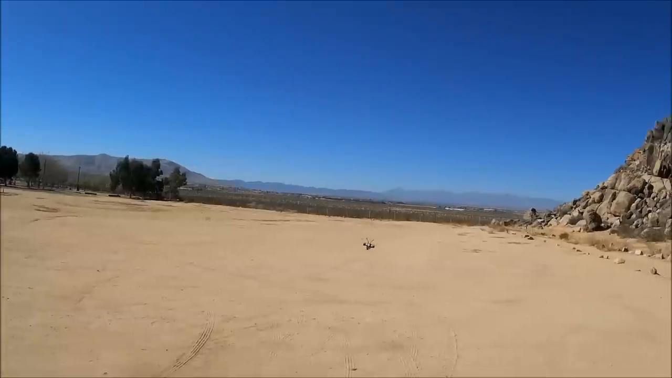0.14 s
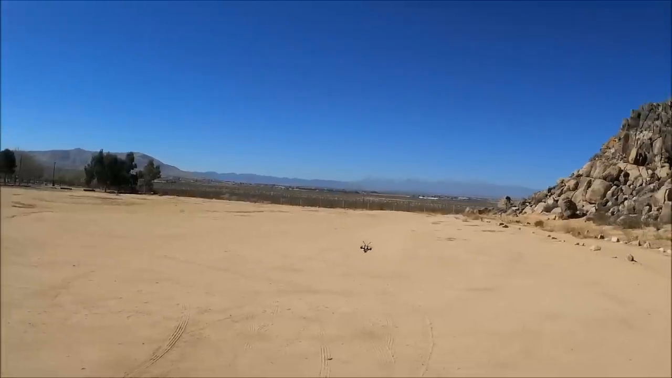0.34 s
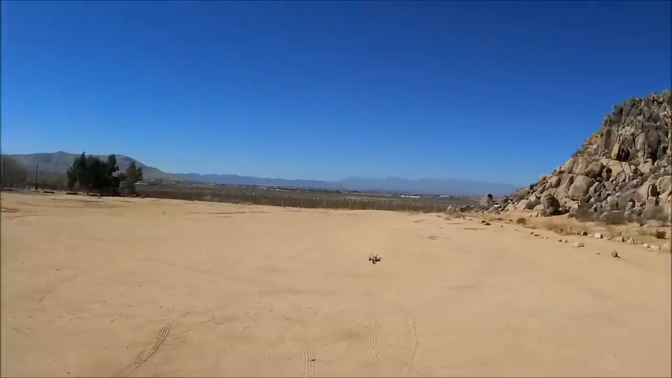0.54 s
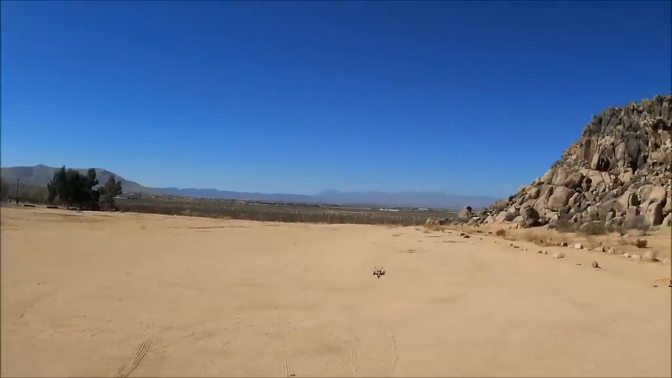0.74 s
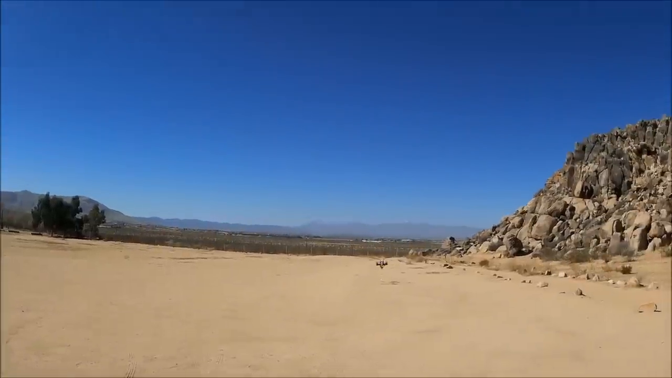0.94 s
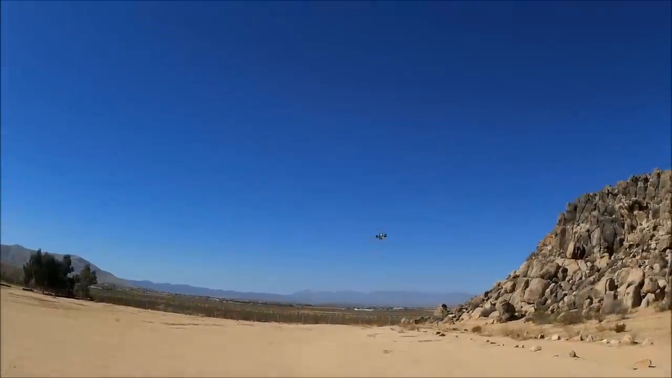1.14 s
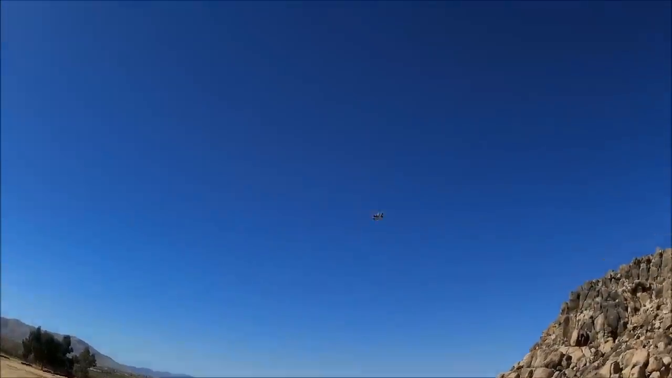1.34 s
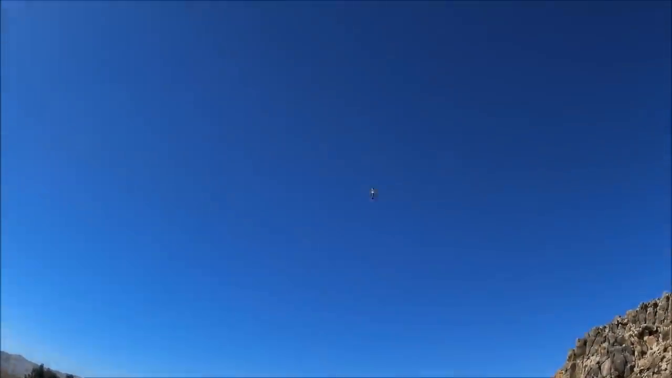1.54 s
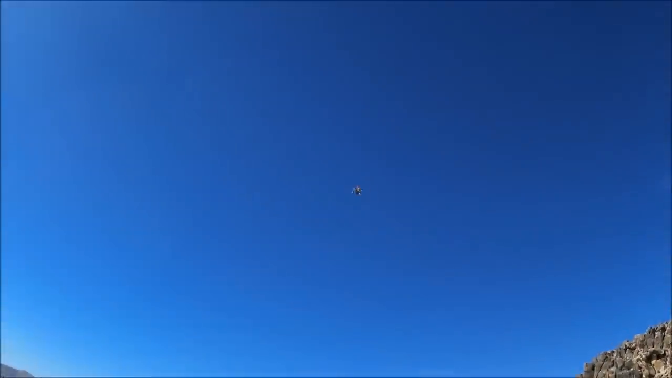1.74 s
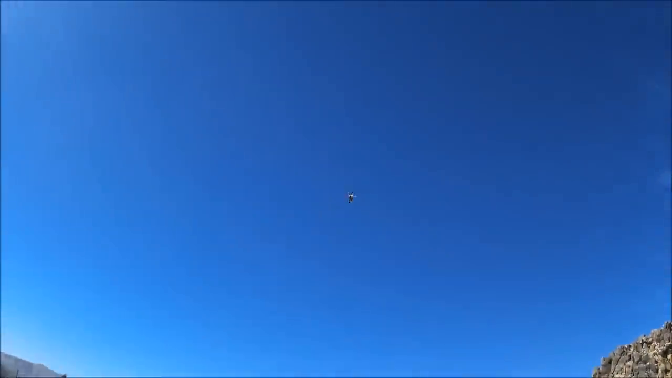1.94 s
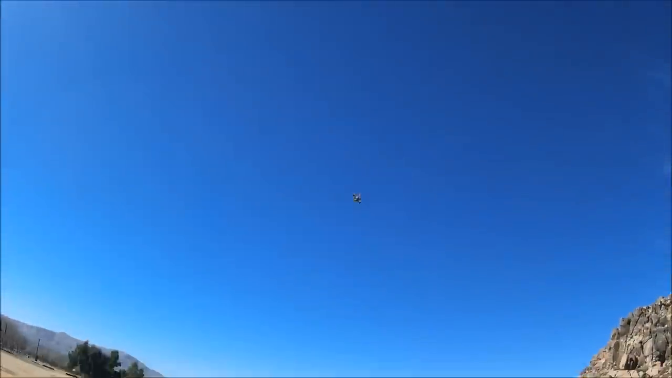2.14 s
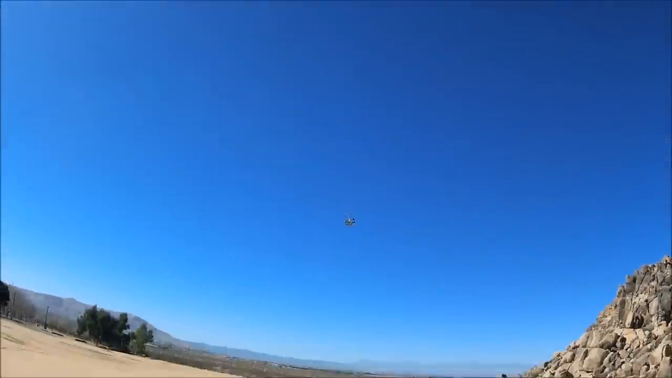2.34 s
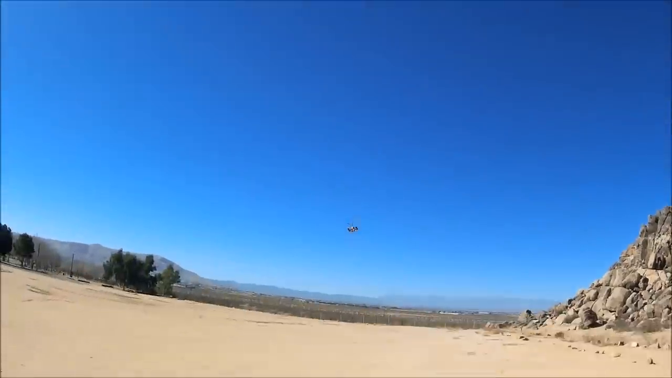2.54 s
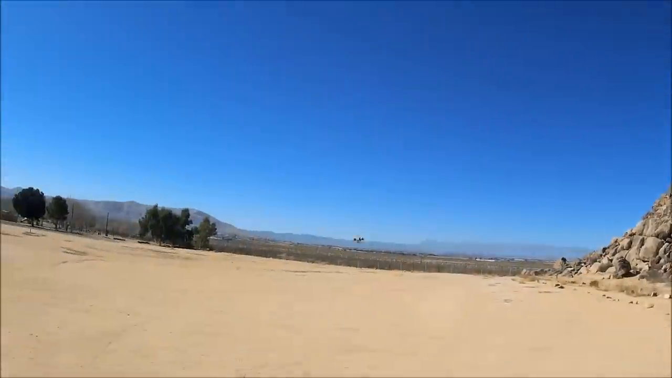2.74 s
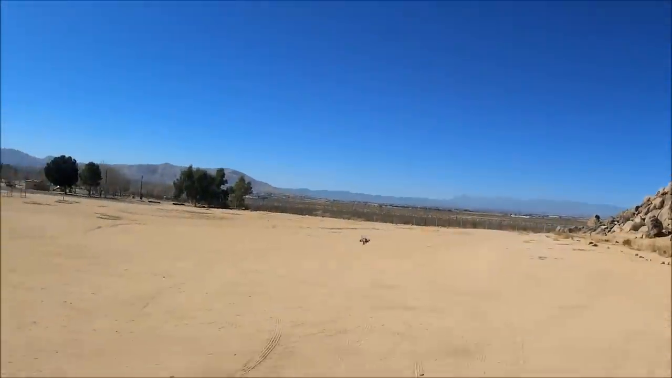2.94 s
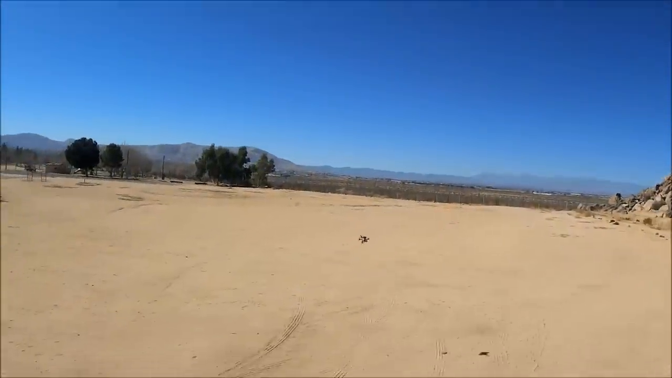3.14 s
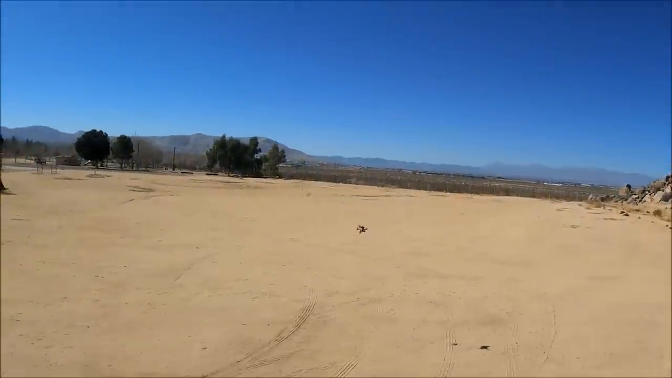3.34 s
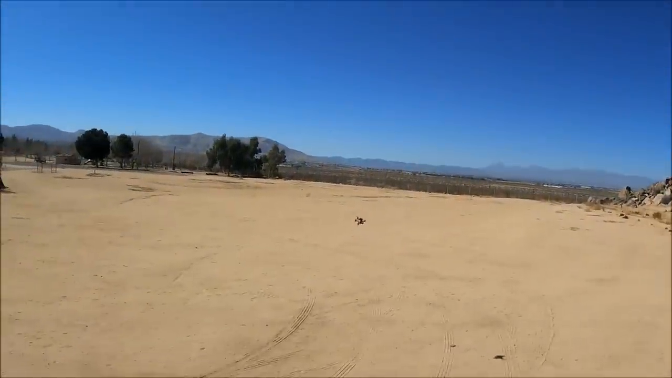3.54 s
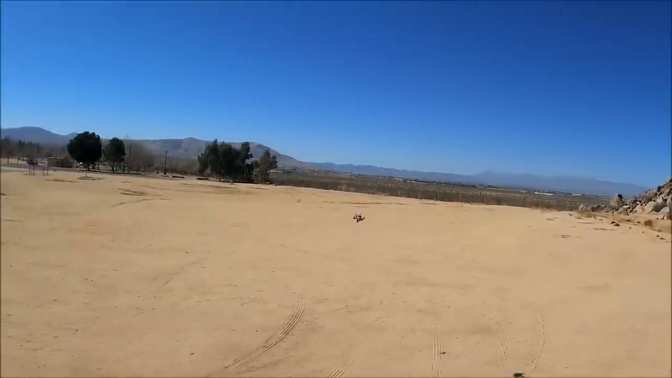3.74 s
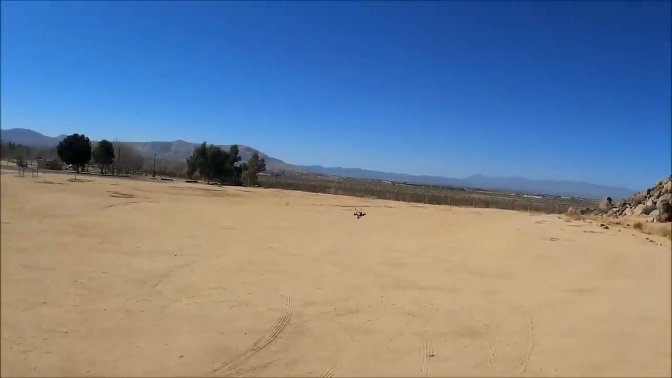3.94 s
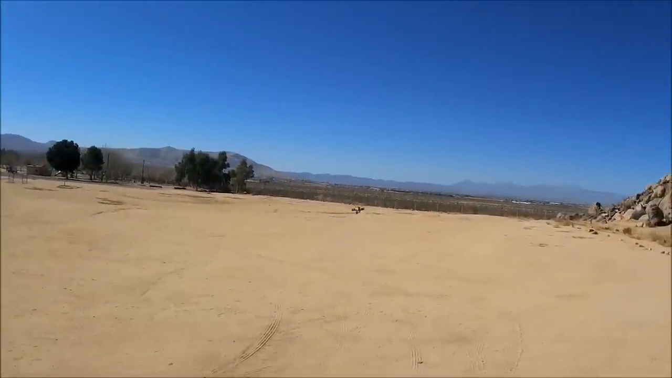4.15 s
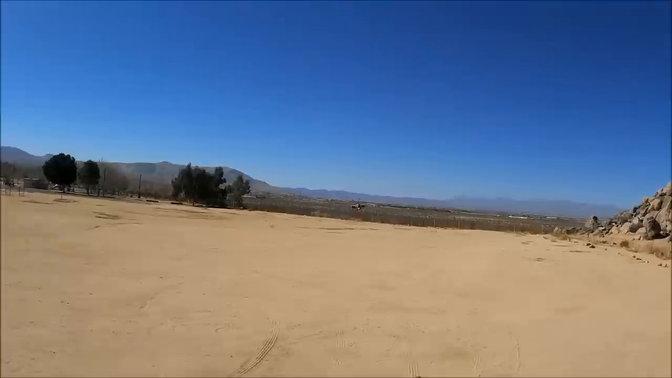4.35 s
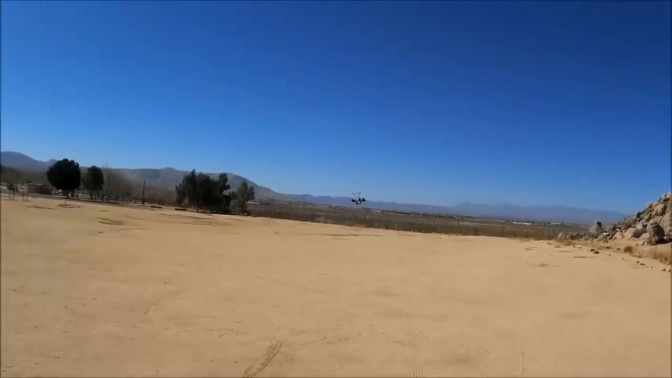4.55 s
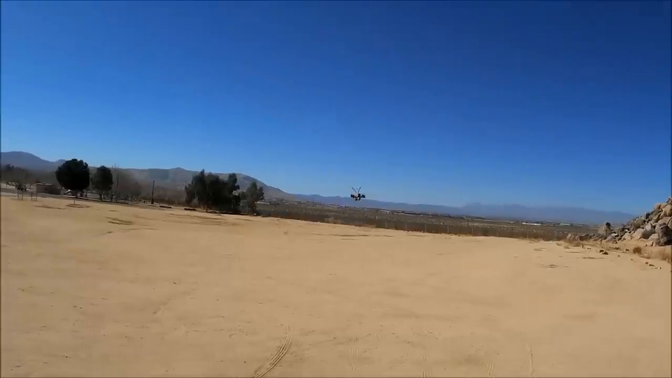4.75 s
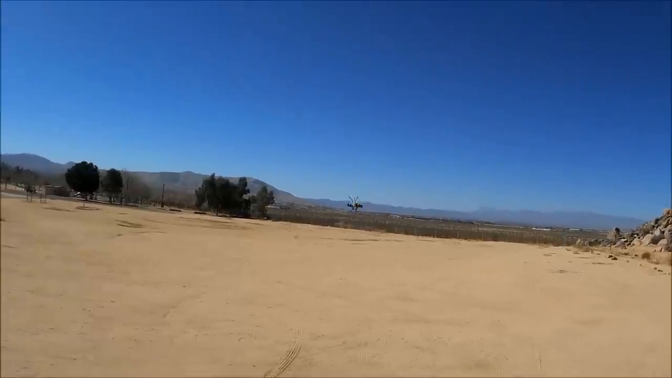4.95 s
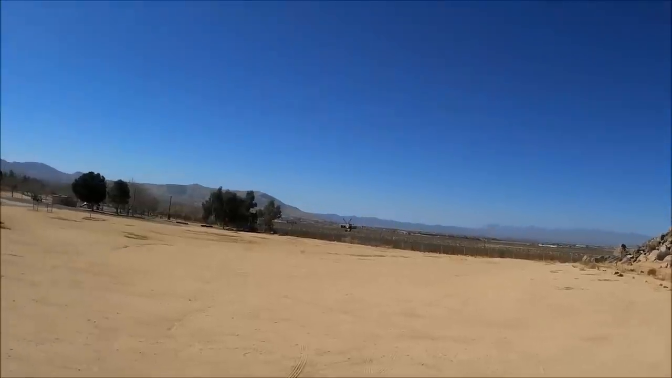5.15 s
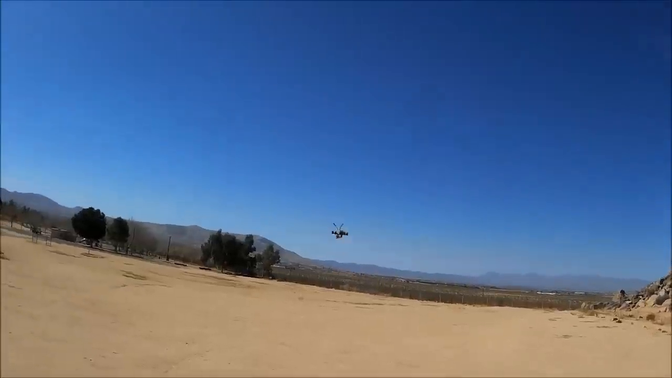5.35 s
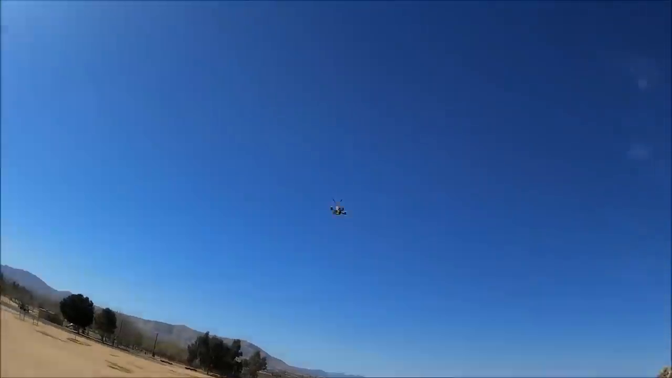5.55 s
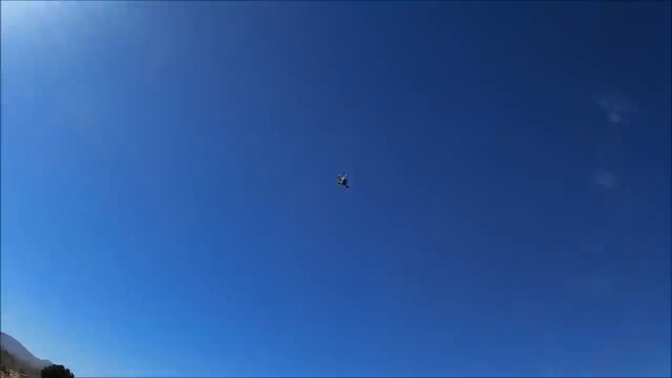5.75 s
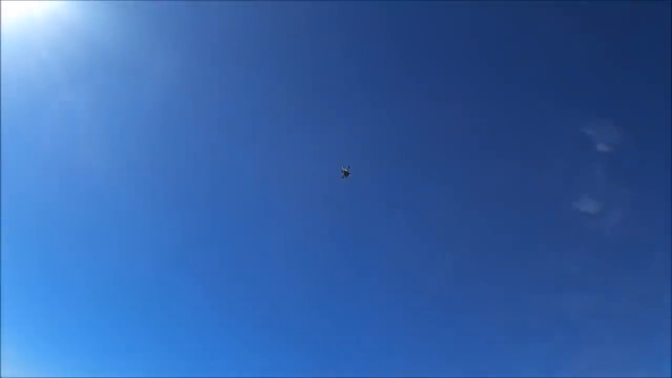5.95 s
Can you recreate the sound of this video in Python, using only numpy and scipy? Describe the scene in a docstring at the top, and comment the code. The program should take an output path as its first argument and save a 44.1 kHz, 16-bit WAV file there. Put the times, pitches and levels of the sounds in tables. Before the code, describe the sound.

A small quadcopter flies tricks over an open dry field, heard from a little way off. From 0 s its four slightly mistuned rotors give a moderate, beating buzz around 1.1 kHz, stepping upward. At 0.7 s a throttle punch winds quickly to a loud, piercing whine near 1.8 kHz, held with hissing wash and a rough frame buzz until about 1.2 s. The pitch then plunges to a thin, quiet, fluttering idle near 780 Hz until 2.2 s. From 2.3 to 3.1 s it returns coarse and turbulent, rising in uneven steps to about 1.5 kHz with heavy airy hiss. It sinks by 3.4 s into a softer wavering drone, with a short blip at 4.0 s. At 5.0 s another loud surge climbs near 1.8 kHz, buzzing before dropping after 5.55 s to a fading idle. Faint wind, low distant hum and short dull echoes remain underneath.

```python
"""A micro quadcopter with three-bladed propellers flies tricks over an open dry field.
Each punch of throttle winds four slightly unequal rotors, built from sine waves, up into a beating whine.
Prop wash, made of shaped noise, hisses around it; between punches the rotors fall back to a thin idle.
A short wash of echoes, light wind and a far low hum lie underneath."""
import sys
import numpy as np
from scipy import signal
from scipy.fft import rfft, irfft, next_fast_len
from scipy.io import wavfile

SR = 44100
rng = np.random.default_rng(int(sys.argv[2]) if len(sys.argv) > 2 else 0)


def wav_out(sig):
    """Save sig, one row per channel (or a flat mono array), as 16-bit PCM at SR to the path in sys.argv[1]."""
    wavfile.write(sys.argv[1], SR, np.round(np.clip(np.atleast_2d(sig).T, -1, 1) * 32767).astype(np.int16))


N = 265041
TIME = np.arange(N) / SR


def from_db(db):
    """Decibels to gain."""
    return 10 ** (np.asarray(db) / 20)


def rms_one(x):
    """Scale to an rms (average strength) of 1."""
    return x / np.sqrt(np.mean(x ** 2) + 1e-20)


def in_time(rows):
    """Draw straight lines between the rows of a table, for each column after the time."""
    s, *columns = np.transpose(rows)
    return [np.interp(TIME, s, column) for column in columns]


def at_hz(points, hz):
    """Read a level off a spectrum, on a log-frequency axis."""
    where_hz, level = np.transpose(points)
    return np.interp(np.log(hz), np.log(where_hz), level)


def during(start_s, end_s, edge_s):
    """A soft gate: 1 between two moments, 0 outside."""
    opening = np.tanh((TIME - start_s) / (2 * edge_s))
    closing = np.tanh((TIME - end_s) / (2 * edge_s))
    return (opening - closing) / 2


def drift(rate_hz):
    """Slow random wandering with spread 1: coarse noise, smoothed twice by a low-pass."""
    step, warm_up = 20, 2000   # samples per coarse point; coarse points thrown away while the filter settles
    pole = np.exp(-2 * np.pi * rate_hz * step / SR)
    noise = rng.standard_normal(N // step + warm_up + 2)
    slow = signal.lfilter([1], [1, -2 * pole, pole * pole], noise)[warm_up:]
    return np.interp(np.arange(N) / step, np.arange(len(slow)), rms_one(slow))


def banded_noise(spectrum):
    """Noise with the shape of the given spectrum; rms 1."""
    size = next_fast_len(N)
    hz = np.maximum(np.arange(size // 2 + 1) * SR / size, 1)
    shaped = rfft(rng.standard_normal(size)) * from_db(at_hz(spectrum, hz))
    return rms_one(irfft(shaped, size)[:N])


def common_speed():
    """Blade-pass pitch (Hz): each punch winds the rotors up against their inertia, then lets them fall back."""
    # pitch that the throttle rests at between punches: t/s, f/Hz
    cruise = [(0, 1056), (.15, 1059), (.28, 1133), (.45, 1135), (.6, 1269), (.9, 1279), (1.18, 805.4),
              (2.1, 769), (2.26, 887.6), (2.38, 1210), (2.6, 1207), (3.7, 1118), (3.95, 1097), (4.35, 1037),
              (4.55, 1022), (4.9, 1010), (5.3, 1059), (5.55, 762.5), (6.01, 787)]
    # punches of throttle, each building on what is already there:
    # start/s, top f/Hz, spin-up time/s, let-go t/s, spin-down time/s
    punches = [(.67, 1828, 0.066, 1.189, .13), (2.48, 1367, .022, 3.374, .165),
               (2.57, 1416, .022, 3.26, .075), (2.85, 1540, .055, 3.245, .05),
               (3.972, 1335, 0.025, 4.125, .1), (5.01, 1797, 0.072, 5.563, .163)]
    hz, = in_time(cruise)
    for start_s, top_hz, up_s, let_go_s, down_s in punches:
        rise = np.maximum(TIME - start_s, 0) / up_s
        fall = np.maximum(TIME - let_go_s, 0) / down_s
        punch = (1 - (1 + rise) * np.exp(-rise)) * np.exp(-fall ** 2)
        hz = hz + (top_hz - hz) * punch
    return hz


def rotor_speeds(hz):
    """Blade-pass pitch of four rotors: a little apart, the outer two shifting to steer the craft."""
    # each rotor in level flight, slowest first: share above the common speed
    trim = [-.016, -.006, .006, .018]
    # the slowest and fastest rotor leave or rejoin the others: start/s, end/s, share slower, share faster
    tilts = [(0, 1.215, .012, 0.037), (.88, 1.25, 0.036, -.004), (1.552, 2.47, .03, .05),
             (2.56, 3.12, .115, -.003), (3.14, 3.6, -.008, -.012), (4.3, 5.028, -.008, .03),
             (5.14, 5.599, .04, -.013)]
    tilt = 0
    for start_s, end_s, slower, faster in tilts:
        tilt = tilt + np.outer([-slower, 0, 0, faster], during(start_s, end_s, edge_s=0.0199))
    return hz * (1 + np.array(trim)[:, None] + tilt)


def slowing(hz):
    """How fast the rotors lose speed (octaves per second)."""
    return np.maximum(-np.gradient(np.log2(hz)) * SR, 0)


def blade_levels(hz, buffet):
    """Levels (dB) of blade tone, fourth order, overtones and wash, from speed, braking, load and facing."""
    # blade-pass tone by speed, before the changes below: blade-pass f/Hz, level/dB
    tone = [(760, -77.5), (1050, -64), (1180, -57), (1320, -49), (1480, -46.5), (1680, -37), (1850, -36)]
    # the fourth shaft order swells as it crosses a resonance: its own f/Hz, level/dB before the changes below
    fourth = [(1020, -99.5), (1380, -66.5), (1560, -67), (1660, -56), (1750, -47.5), (1950, -57.5),
              (2200, -62.5), (2420, -60)]
    # the turning craft beams its sound towards or away from the microphone:
    # t/s, blade tone change/dB, overtones and wash change/dB
    facing = [(0, -5, -1.5), (.25, -0.5, -2.5), (.6, 1.5, 0.5), (.95, 3, -1), (1.17, -1, 0),
              (1.4, -4.5, -5), (2.28, 0.5, -1), (2.42, 3.5, -0.5), (2.55, 4, 0), (2.72, 2, 0),
              (2.93, -0.5, -3), (3.06, 2.5, -4), (3.16, -11, -2), (3.28, -2.5, -3.5), (3.55, -4, -2),
              (3.76, -11.5, -3), (3.95, -5, -4), (4.14, 3, 3.5), (4.4, -0.5, -2.5), (5, 0, 1.5),
              (5.25, 5, 3.5), (5.62, 3, 1.5), (5.78, 1.5, 4), (5.88, -4, -4.5), (6.01, -22, -5)]
    tone_facing_db, hiss_facing_db = in_time(facing)
    octaves = np.log2(hz / 1845)
    braking = slowing(hz)
    # pulling out of the dive loads the blades
    pull = during(2.392, 3.106, edge_s=0.035)

    def grown(full_db, idle_db, db_per_octave):
        """A power law of speed above an idle level, changed by the facing."""
        power_law = from_db(full_db + db_per_octave * octaves)
        return 20 * np.log10(np.hypot(power_law, from_db(idle_db))) + hiss_facing_db

    # braking blades are louder: dB for each octave per second of slowing
    strain_db = 0.99 * braking + 2.5 * pull
    stall_db = 2.5 * buffet ** 4   # blade tone lost in buffeting
    tone_db = at_hz(tone, hz) + strain_db + tone_facing_db - stall_db
    # the fourth order follows only part of the tone's beaming
    fourth_db = at_hz(fourth, hz * 4 / 3) + strain_db + 0.24 * tone_facing_db
    overtone_db = grown(full_db=-49.5, idle_db=-74.5, db_per_octave=30.5) + 0.87 * braking + 10.5 * pull
    wash_db = grown(full_db=-52, idle_db=-79, db_per_octave=23.5) + 0.95 * braking + 10 * pull
    return tone_db, fourth_db, overtone_db, wash_db


def rotor(blade_hz, tone_db, fourth_db, overtone_db, buffet):
    """One motor and its three blades: a stack of shaft orders. Returns the sound and the shaft angle."""
    # overtones of a loaded blade: multiple of blade pass, relative level/dB
    overtones = [(2, 2), (3, -3), (4, -6.5), (5, -10), (6, -19), (7, -22)]
    # unequal blades also sound at other shaft orders: multiple of shaft speed, level/dB relative to the overtones
    imbalance = [(5, -11.5), (7, -15), (8, -14), (10, -17), (11, -15.5), (13, -50), (16, -14), (20, -23)]
    # how the small frame radiates the shaft hum and overtones: f/Hz, boost/dB
    frame = [(370, -0.5), (450, 2.5), (495, -3.5), (545, -2), (600, -1), (900, 7), (1550, 2.5), (2050, 3.5),
             (2350, -11), (2850, 2.5), (3100, 1.5), (3550, 1.5), (4000, -4), (4550, 2.5), (5250, 5.5),
             (5900, -4), (7200, -1), (8000, -25), (9000, 1), (11000, 9)]
    # the flight controller keeps trimming the speed, and eddies jostle the blades (shares of the speed)
    hunting = 0.003011 * drift(13.26)
    jitter = 0.003007 * drift(142.6)
    wake_jitter = 0.02989 * buffet ** 2 * drift(49.4)
    shaft_hz = blade_hz / 3 * (1 + hunting + jitter + wake_jitter)
    angle = 2 * np.pi * np.cumsum(shaft_hz) / SR
    flutter_db = 2.5 + 4.5 * buffet

    def partial(order, level_db):
        """One fluttering shaft order, carrying a quarter of the power of the four rotors."""
        wave = np.sin(order * angle + rng.uniform(0, 2 * np.pi)) / np.sqrt(2)
        return from_db(level_db + flutter_db * drift(14.7)) * wave

    # the hum of an unbalanced shaft grows steeply with its speed
    hum_db = -61 + 95 * np.log10(shaft_hz / 500)
    hum = partial(order=1, level_db=hum_db + at_hz(frame, shaft_hz))
    hum = hum + partial(order=2, level_db=np.maximum(hum_db - 10, fourth_db - 17))
    blades = partial(order=3, level_db=tone_db) + partial(order=4, level_db=fourth_db + 0.6)
    orders = [(3 * round(k), db) for k, db in overtones] + [(round(k), db) for k, db in imbalance]
    edge = sum(partial(k, overtone_db + db + at_hz(frame, k * shaft_hz)) for k, db in orders)
    roughness = from_db(2 * drift(74) - 5.5)
    return hum + blades + edge * roughness, angle


def motor_whistle(angle, buffet, speed_hz):
    """One motor sings thinly as its magnets pass the stator teeth; buffeting and braking thin the note out."""
    # magnetic whine: multiple of shaft speed, level/dB before the changes below
    cogging = [(24, -76.5), (30, -77), (36, -62.5)]
    # how the motor radiates its whine: f/Hz, boost/dB
    motor_case = [(8000, -37), (9400, 0), (10300, 5), (11000, 10.5), (11600, 20), (12250, -10),
                  (12900, -18), (16000, -37)]
    shaft_hz = np.gradient(angle) * SR / (2 * np.pi)
    lines = 0
    for order, db in cogging:
        gain = from_db(db + at_hz(motor_case, order * shaft_hz))
        lines = lines + gain * np.sin(round(order) * angle)
    steady = np.clip(1 - 1.3 * buffet ** 2, 0, 1)
    brake_loss_db = 1.5 * slowing(speed_hz)   # 1.5 dB for each octave per second
    return steady * lines * from_db(3 * drift(20) - 8 - brake_loss_db)


def frame_rattle(angles):
    """Late in a full punch the frame buzzes roughly on the fifth shaft order of all four motors."""
    # start/s, end/s, level/dB
    rattles = [(0.993, 1.224, -49), (5.483, 5.589, -50)]
    level = sum(from_db(db) * during(start_s, end_s, edge_s=0.022) for start_s, end_s, db in rattles)
    shake = sum(np.sin(5 * angle) * from_db(3.5 * drift(120)) for angle in angles)
    return level * rms_one(shake)


def prop_wash(level_db, angles, buffet):
    """Turbulent hiss, chopped each time a blade sweeps past an arm; buffeting thins out its low part."""
    # turbulence off the blades: f/Hz, relative level per Hz/dB
    wash = [(100, 7), (250, -0.5), (600, 11.5), (850, 8.5), (1250, 10.5), (1800, 15), (2200, -8.5),
            (3000, 3), (4000, -1.5), (5100, 6.5), (6000, -2), (7900, -2), (9000, 4), (12200, 6),
            (12900, -6), (15500, -10)]
    hiss = banded_noise(wash)
    treble_filter = signal.butter(4, 6000, "high", fs=SR, output="sos")
    body_filter = signal.butter(1, 900, fs=SR, output="sos")
    treble = signal.sosfilt(treble_filter, hiss)
    body = signal.sosfilt(body_filter, hiss)
    # scaled so that the treble of the full hiss has spread 1
    hiss = (hiss - np.clip(buffet, 0, 1) * body) / np.std(treble)
    sweeps = sum(np.cos(3 * angle) for angle in angles)
    chopping = rms_one(1 + 0.32 * sweeps)
    return hiss * chopping * from_db(level_db - 3.5)


def scatter(x):
    """Ground and rocks throw back a short, dull wash of echoes: noise that dies away."""
    t = TIME[:SR // 2]
    t60_s = 0.31   # time to fall by 60 dB
    tail = rng.standard_normal(len(t)) * from_db(-60 * t / t60_s) * (t > 0.005)
    tail /= np.sqrt(np.sum(tail ** 2))
    tail = signal.sosfilt(signal.butter(1, 4000, fs=SR, output="sos"), tail)
    return from_db(-15) * signal.fftconvolve(x, tail)[:N]


def still_air():
    """Steady faint hiss of still air and microphone."""
    # f/Hz, relative level per Hz/dB
    air = [(25, -8), (140, -5), (220, -11), (400, -18), (600, -16), (1000, -22.5), (2500, -30), (6000, -29),
           (10000, -27), (15500, -30.5)]
    return from_db(-68) * banded_noise(air)


def field():
    """Wind lumps on the microphone, made of low noise, and a far wavering hum of two sine waves."""
    # colour of the wind: f/Hz, relative level per Hz/dB
    wind = [(20, 9), (40, 2.5), (70, 6), (130, -17.5), (300, -3.5), (1000, -65), (15000, -100)]
    # middle level of the wind, which then wanders: t/s, level/dB
    gusts = [(0.0, -69.5), (0.47, -65), (0.72, -59), (1.92, -80.5), (2.56, -68.5), (6.01, -68)]
    # far low hum, which also wanders in pitch and level: t/s, f/Hz, level/dB
    hum_path = [(0, 99.3, -69), (1.6, 100.2, -80.5), (3.4, 89.1, -72.5), (3.85, 88.1, -66),
                (4.15, 98.36, -60.5), (4.6, 98.85, -69.5), (5, 102.8, -72.5), (6.01, 99.75, -69.5)]
    gust_db, = in_time(gusts)
    hum_hz, hum_db = in_time(hum_path)
    phase = 2 * np.pi * np.cumsum(hum_hz * (1 + 0.0223 * drift(10.6))) / SR
    # a quieter second note sounds at one and a half times the pitch
    hum = np.sin(phase) + from_db(-7) * np.sin(3 * phase / 2)
    wind_noise = from_db(gust_db + 2.5 * drift(21)) * banded_noise(wind)
    return wind_noise + from_db(hum_db + 2.5 * drift(16)) * hum


def brief_dips():
    """Gain that sinks for an instant now and then, along bell-shaped curves."""
    # t/s, depth/dB, width/s
    dips = [(.243, 9, .006), (.374, 8, .005), (2.122, 9, .006), (2.311, 14, .007), (2.74, 9, .006),
            (2.834, 24, .008), (3.125, 5, .006), (3.868, 6, .006), (4.338, 8, .006), (4.6, 6, .005),
            (4.705, 7, .005), (4.852, 8, .005), (5.343, 5, .006), (5.77, 8, .006)]
    loss_db = sum(depth_db * np.exp(-0.5 * ((TIME - s) / width_s) ** 2) for s, depth_db, width_s in dips)
    return from_db(-loss_db)


def scene():
    """Four rotors and their wash over the quiet field; all but the direct whine dips briefly at times."""
    # falling into its own wake buffets the blades: t/s, buffeting from 0 to 1
    buffet_path = [(0, 0.02), (1.2, 0.14), (1.33, 0.55), (2.1, 0.6), (2.2, 0.98), (2.42, 1), (2.56, .63),
                   (3.05, .42), (3.15, 0.09), (5, 0.06), (5.6, 0.11), (5.79, 0.49), (6.01, .55)]
    # how loudly each rotor reaches the microphone, slowest first: relative level/dB
    rotor_db = [-3.5, 1, -0.1, -0.95]
    # how much edge each rotor has, slowest first: change of its overtones/dB
    rotor_edge_db = [2, -4, 2.5, -1]
    buffet, = in_time(buffet_path)
    speed_hz = common_speed()
    tone_db, fourth_db, overtone_db, wash_db = blade_levels(speed_hz, buffet)
    tones, angles = [], []
    for blade_hz, edge_db in zip(rotor_speeds(speed_hz), rotor_edge_db):
        tone, angle = rotor(blade_hz, tone_db, fourth_db, overtone_db + edge_db, buffet)
        tones.append(tone)
        angles.append(angle)
    rotors = from_db(rotor_db) @ np.array(tones)
    whine = rotors + motor_whistle(angles[0], buffet, speed_hz) + frame_rattle(angles)
    hiss = prop_wash(wash_db, angles, buffet) + still_air()
    surroundings = scatter(whine) + hiss + field()
    return (whine + surroundings * brief_dips())[None]


def record(dry):
    """A steep low-pass cuts the top above 15600 Hz."""
    low_pass = signal.ellip(10, 0.2, 80, 15600, fs=SR, output="sos")
    return signal.sosfilt(low_pass, dry)


dry = scene()
out = record(dry)
wav_out(out)
```